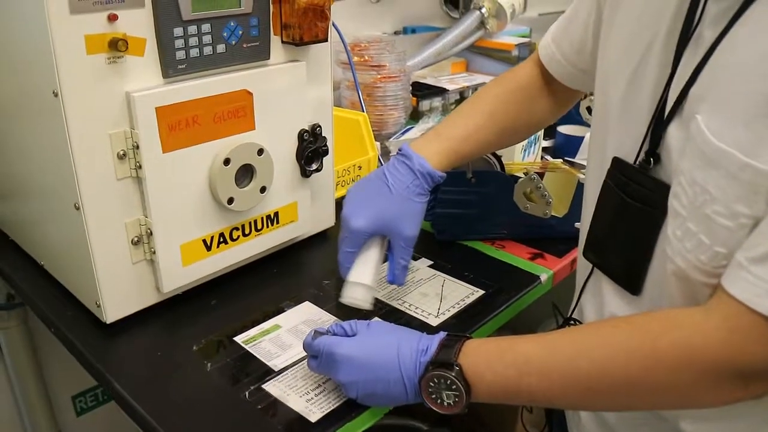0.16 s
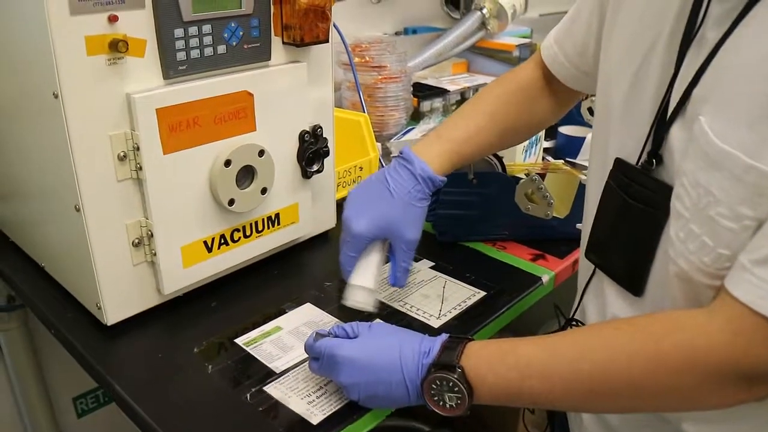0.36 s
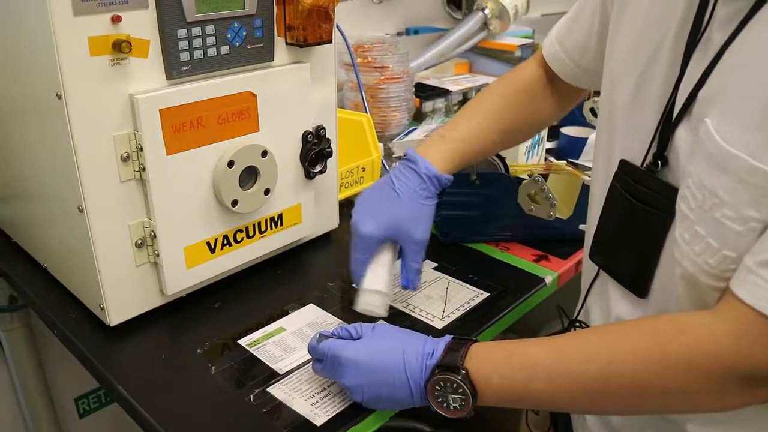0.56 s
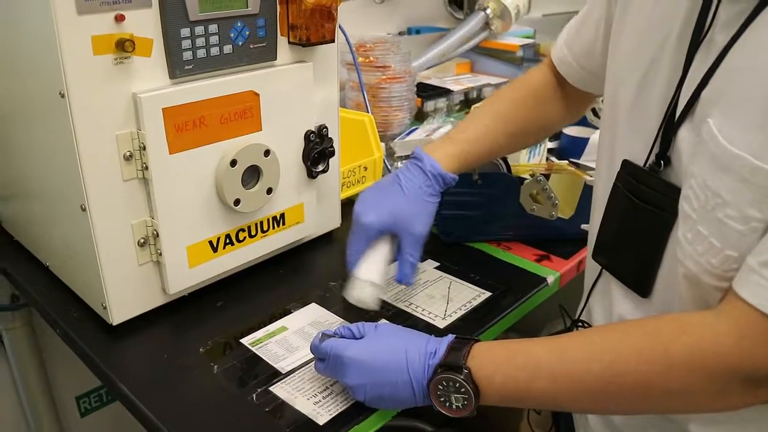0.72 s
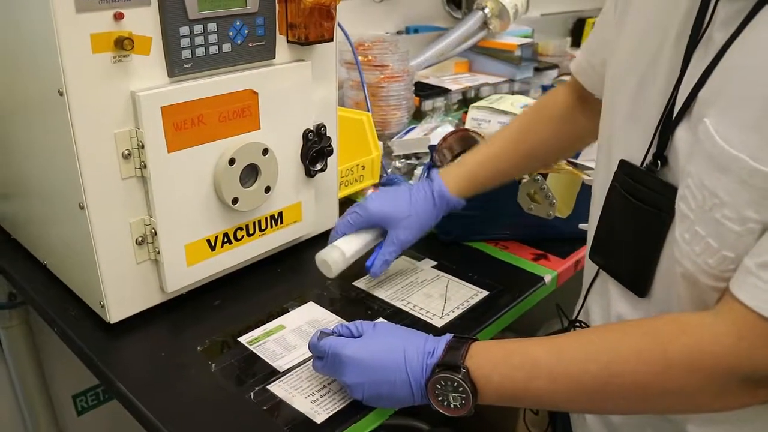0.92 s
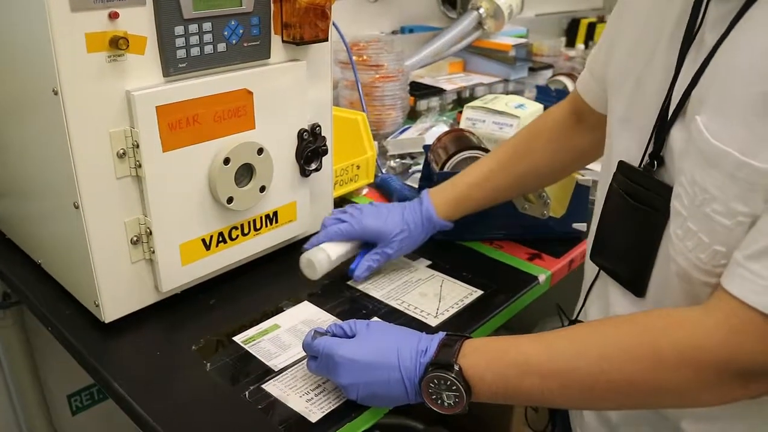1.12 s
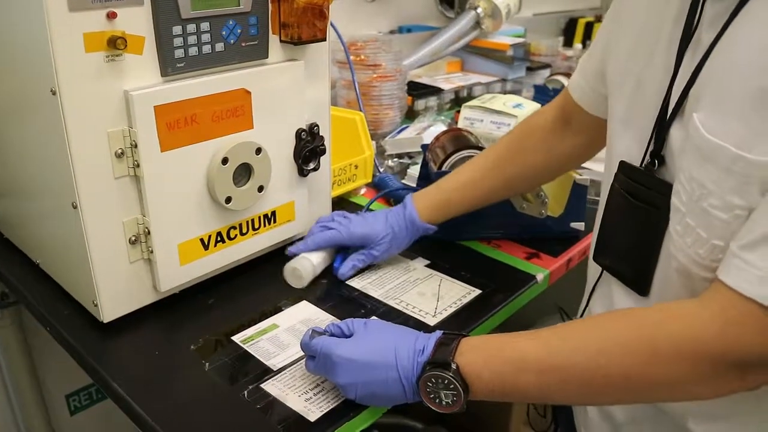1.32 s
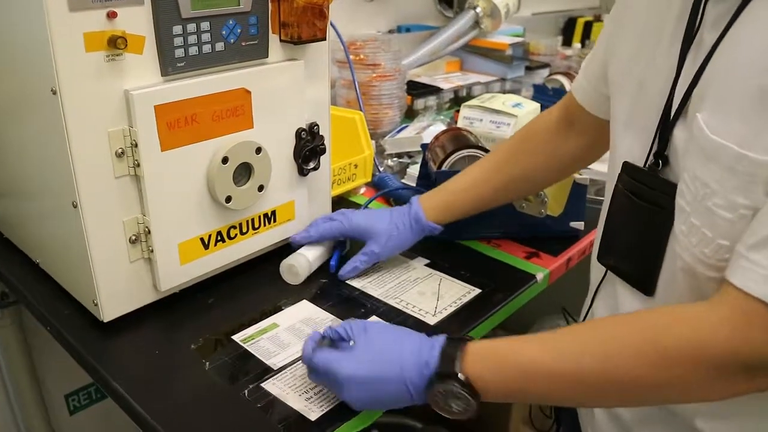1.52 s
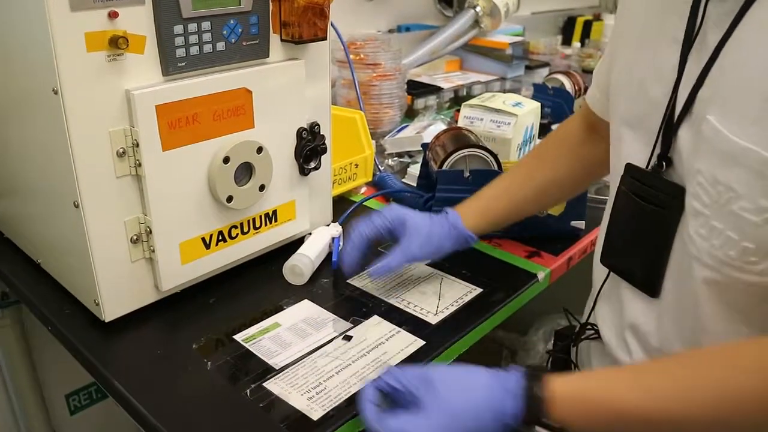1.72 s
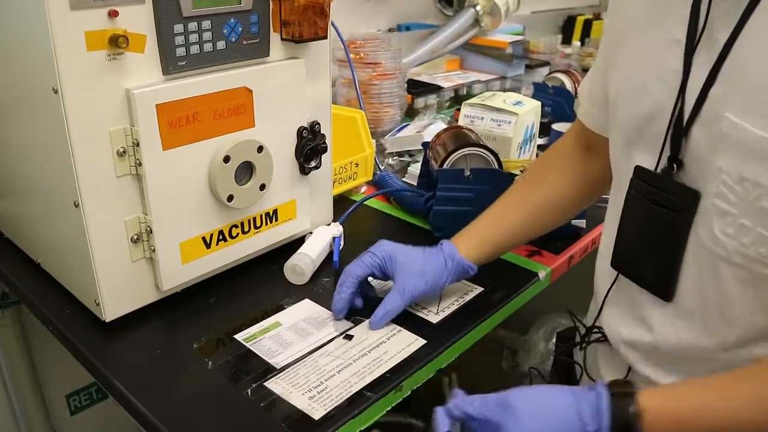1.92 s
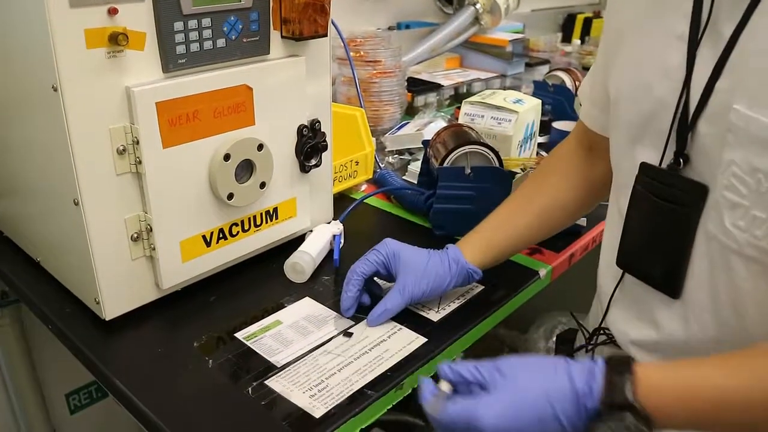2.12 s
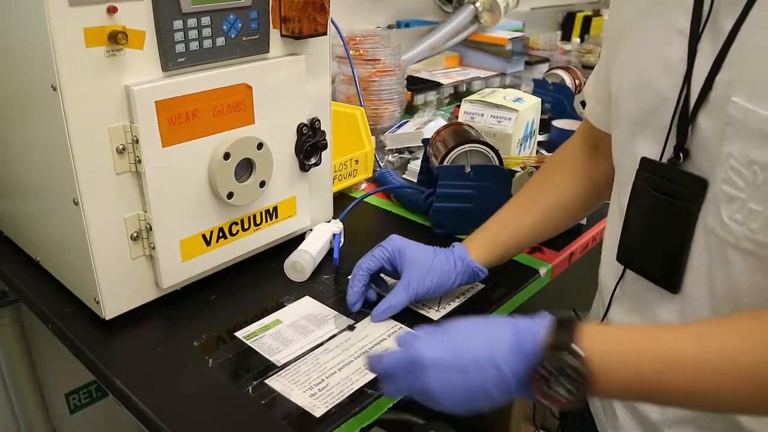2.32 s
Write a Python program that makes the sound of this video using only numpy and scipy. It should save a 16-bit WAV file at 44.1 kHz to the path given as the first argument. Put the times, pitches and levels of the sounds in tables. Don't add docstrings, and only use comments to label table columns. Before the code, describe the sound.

Close, bright air-jet hiss from a blower stops suddenly, leaving a rattling pump and fans in a small lab; then a sharp clattering knock rings the bench top, and the recorder's automatic gain ducks the background.

```python
import sys
import numpy as np
from scipy import signal
from scipy.fft import rfft, irfft
from scipy.io import wavfile
from scipy.ndimage import uniform_filter1d

SR = 44100
rng = np.random.default_rng(int(sys.argv[2]) if len(sys.argv) > 2 else 0)


def dump(signal):
    limited = np.clip(np.atleast_2d(signal).T, -1, 1)
    pcm = np.round(limited * 32767).astype(np.int16)
    wavfile.write(sys.argv[1], SR, pcm)


def invert_db(level):
    return 10 ** (np.asarray(level, dtype=float) / 20)


N = 104428
t = np.arange(N) / SR

STROKE_HZ = 59.6
PUFF_PHASE = .74
# frequency in Hz, width in Hz, level in dB.
VALVE_TONES = [(2750, 350, -5), (3300, 350, -4), (3740, 120, -10), (4100, 120, -10), (5400, 380, 0),
               (6000, 350, -1)]


def level(x, db):
    return x * invert_db(db) / np.sqrt(np.mean(x ** 2))


def band(x, hz, width):
    return signal.lfilter(*signal.iirpeak(hz, hz / max(width, 5), fs=SR), x)


def narrow_band(x, hz, width, second_width):
    return level(band(band(x, hz, width), hz, second_width), 0)


def ring(x, hz, t60):
    pole = np.exp(2j * np.pi * hz / SR - np.log(1000) / (max(t60, 1e-3) * SR))
    return signal.lfilter([1], [1, -pole], x).imag


def walk(rate):
    k = int(SR / rate)
    steps = np.repeat(rng.standard_normal(N // k + 1), k)
    drift = uniform_filter1d(uniform_filter1d(steps, k), k)[:N]
    return drift / drift.std()


def curve(rows, column=1):
    rows = np.array(rows)
    return np.interp(t, rows[:, 0], rows[:, column])


def coloured(points, flicker_db, rate):
    f = np.maximum(np.arange(N // 2 + 1) * SR / N, 1)
    hz, db = np.array(points).T
    gain = invert_db(np.interp(np.log(f), np.log(hz), db))
    out = 0
    for octave in np.arange(4, 15, .5):
        share = np.sqrt(np.clip(1 - 2 * np.abs(np.log2(f) - octave), 0, 1))
        part = irfft(rfft(rng.standard_normal(N)) * gain * share, N)
        out = out + part * invert_db(flicker_db * walk(rate))
    return level(out, 0)


def resonant(rows, flicker_db, rate):
    out = 0
    for hz, width, db in rows:
        noise = narrow_band(rng.standard_normal(N), hz, width, 1.56 * width)
        out = out + invert_db(db + flicker_db * walk(rate)) * noise
    return level(out, 0)


def blower():
    # time in seconds, level in dB, treble in dB as the nozzle turns.
    flow = [(0, -19, 0), (.2, -20.5, 3.5), (.26, -21, 4), (.3, -18.5, -0.5), (.46, -20.5, 5), (.58, -18, 3),
            (.8, -19, 1.5), (.86, -19.5, -0.5)]
    # frequency in Hz, width in Hz, level in dB.
    nozzle = [(2745, 590, -8.5), (3435, 380, -1), (4046, 250, -0.5), (4650, 600, -5), (9600, 410, -3.5),
              (9040, 510, -10.5)]
    # frequency in Hz, width in Hz, level in dB.
    airy = [(11500, 290, -6), (11840, 470, 0), (13000, 330, -1), (13600, 400, -6), (14300, 450, -4),
            (15300, 500, -1.5)]
    # frequency in Hz, level per Hz in dB.
    jet = [(300, -25.5), (800, -0.5), (1600, -0.5), (2000, -15), (5500, -0.5), (8000, -5.5), (10700, -9),
           (14500, -13.5)]
    shut_s, shut_db_per_s = .868, 330
    tail_db, tail_t60_s = -18, .2
    after = np.maximum(t - shut_s, 0)
    closing_power = invert_db(-2 * shut_db_per_s * after)
    tail_power = invert_db(2 * (tail_db - 60 * after / tail_t60_s))
    shut = np.sqrt(closing_power + tail_power)

    air = resonant(nozzle, 0.94, 40)
    air = air + invert_db(-14.5) * resonant(airy, 2.2, 6.4)
    air = air + invert_db(-8) * coloured(jet, 0.67, 17.3)
    bass = signal.sosfiltfilt(signal.butter(2, 7500, fs=SR, output="sos"), air)
    treble = (air - bass) * invert_db(curve(flow, column=2)) * shut ** .3
    gusts_db = .6 * walk(24.4)
    return (bass + treble) * invert_db(curve(flow) + gusts_db) * shut


def bench():
    # time in seconds, level in dB, contact in ms, crack in dB, tilt in dB per octave.
    contacts = [(1.3744, -1.5, 0.27, -16, -9), (1.381, -5, 0.44, -25, -20.5), (1.393, -11.5, 0.54, -25, -6),
                (1.4015, -10, 0.51, -25, 3), (1.4122, 10, 0.19, -1, 7.5), (1.4149, 11.5, 0.2, -4, -4.5),
                (1.4167, 3, 0.41, -25, 9.5), (1.42, 4.5, 0.44, -30, 8.5), (1.431, 9.5, 0.2, -20, 3.5),
                (1.449, 0.5, 0.32, -25, -1), (1.458, 0.5, 0.26, -25, -16), (1.467, -3, .4, -25, -11),
                (.846, -19.5, 0.25, -30, 13)]
    # frequency in Hz, level in dB, time to fade by 60 dB in seconds.
    modes = [(432, -17, 0.12), (600, -8.5, 0.063), (720, -2, 0.044), (865, -1.5, 0.035), (934, 2, 0.023),
             (1057, 2, 0.054), (1196, 6, 0.025), (1490, -2, 0.042), (1730, -5, 0.046), (2040, -19, 0.029),
             (2410, -9, 0.012), (3060, -9.5, 0.027), (3450, -9.5, 0.016), (4585, -13, 0.023)]
    out = np.zeros(N)
    crack_db, crack_t60_s, crack_hz = -12.5, 0.017, 3980
    grit = signal.lfilter(*signal.butter(2, crack_hz, fs=SR), rng.standard_normal(N))
    for start, db, ms, bright_db, tilt_db in contacts:
        push = np.exp(-.5 * ((t - start) / (ms / 4000)) ** 2)
        push /= push.sum()
        body = 0
        for hz, mode_db, t60 in modes:
            vary = rng.standard_normal()
            gain = invert_db(mode_db + 2 * vary + tilt_db * np.log2(hz / 800))
            body = body + gain * ring(push, hz * (1 + vary / 100), t60)
        fade_db = -60 * np.maximum(t - start, 0) / crack_t60_s
        crack = (t >= start) * invert_db(crack_db + bright_db + fade_db) * grit
        out += invert_db(db) * (0.17 * body + crack)
    out += handling_ticks()
    out = signal.sosfilt(signal.butter(2, 300, "high", fs=SR, output="sos"), out)

    room_db, room_t60_s = -14.5, 0.22
    lag = t[:SR // 2]
    build_up = np.minimum(lag * 200, 1)
    tail = band(rng.standard_normal(len(lag)), 930, 2200) * invert_db(-60 * lag / room_t60_s) * build_up
    return out + invert_db(room_db) * signal.fftconvolve(out, tail / 10)[:N]


def handling_ticks():
    # time in seconds, level in dB, frequency in Hz, width in Hz, time to fade by 60 dB in seconds.
    ticks = [
        (2.045, -41, 12000, 4000, .012),
        (2.077, -25, 1650, 400, .03),
        (.17, -24, 1600, 400, .04),
        (1.3755, -23, 3580, 200, .025),
    ]
    out = np.zeros(N)
    for start, db, hz, width, t60 in ticks:
        noise = narrow_band(rng.standard_normal(N), hz, width, 2 * width)
        fade = (t >= start) * invert_db(-60 * np.maximum(t - start, 0) / t60)
        out += invert_db(db) * fade * noise
    return out


def pump():
    turns = t * STROKE_HZ
    count = N // 500
    size_db = 1.3 * rng.standard_normal(count) + 2.5 * (np.arange(count) % 2)

    puff_share, leak_db = .25, -12
    since = (turns - PUFF_PHASE) % 1 / puff_share
    stroke = (turns - PUFF_PHASE + 1).astype(int)
    puff = since * np.exp(1 - since * 2) * invert_db(size_db[stroke])
    hiss = level(resonant(VALVE_TONES, 0.37, 7.32) * (puff + invert_db(leak_db)), -38)

    ring_hz, ring_width_hz = 4450, 230
    strike_phase, rebound_phase, rebound_db = .06, .331, -5

    def burst(phase):
        seconds = phase / STROKE_HZ
        return np.exp(-np.pi * ring_width_hz * seconds) * np.sin(2 * np.pi * ring_hz * seconds)

    strike = (turns - strike_phase) % 1
    rebound = (turns - strike_phase - rebound_phase) % 1
    case = band(burst(strike) + invert_db(rebound_db) * burst(rebound), ring_hz, 270)
    case = level(case, -38) * invert_db(walk(6.9))
    rattle = band(band(rng.standard_normal(N), 3670, 260), 4770, 380)
    rattle = level(rattle * (1.2 + np.exp(-strike / 0.22)), -39)
    return hiss + clacks(size_db) + case + rattle


def clacks(size_db):
    count = int(t[-1] * STROKE_HZ)
    jitter_s = .0003 * rng.standard_normal(count)
    times = (np.arange(count) + PUFF_PHASE + 0.048) / STROKE_HZ + jitter_s
    hit = np.zeros(N)
    hit[np.minimum((times * SR).astype(int), N - 1)] = invert_db(size_db[1:count + 1])
    out = 0
    for hz, width, db in VALVE_TONES:
        out = out + invert_db(db + walk(30)) * narrow_band(hit, hz, width, 1.5 * width)
    return level(out, -35.5)


def fans():
    # frequency in Hz, level per Hz in dB.
    fan_air = [(30, -39), (426, -2.5), (2010, -7), (4420, -6.5), (6900, -15), (9500, -15), (12500, -22),
               (16000, -33.5)]
    # frequency in Hz, width in Hz, level in dB.
    housing = [(217.5, 43, -12), (482, 184, 2), (814, 155, 0.5), (1283, 290, -0.5)]
    # frequency in Hz, level in dB.
    whine = [(431, -48), (1739, -48), (2325, -48)]
    out = invert_db(-31) * coloured(fan_air, 1.3, 8.14)
    out = out + invert_db(-33) * resonant(housing, 1.33, 7.23)
    for hz, db in whine:
        tone = np.sin(2 * np.pi * hz * t + .5 * walk(5.8))
        out = out + invert_db(db + 3 + 0.5 * walk(8.5)) * tone
    return out


def scene():
    echo_t60_s, echo_db = .12, -13
    lag = t[:SR // 8]
    echo = rng.standard_normal(len(lag)) * invert_db(-60 * lag / echo_t60_s)
    echo = level(echo, echo_db) / np.sqrt(len(lag))
    steady = blower() + fans()
    steady = steady + signal.fftconvolve(steady, echo)[:N]
    return (steady + bench() + pump())[None]


def low_pass(x):
    return signal.sosfilt(signal.butter(12, 16740, fs=SR, output="sos"), x)


def record(dry):
    # time in seconds, gain in dB.
    gain = [
        (0, -5.5),
        (.6, -1.5),
        (1.37, 2),
        (1.385, 1.5),
        (1.412, -1),
        (1.424, -13),
        (1.55, -10),
        (2.37, -2.5),
    ]
    x = signal.sosfilt(signal.butter(1, 60, "high", fs=SR, output="sos"), dry)
    x = np.clip(x * invert_db(curve(gain)), -1, 1)
    x = signal.sosfiltfilt(signal.ellip(12, .1, 50, 15720, fs=SR, output="sos"), x)
    return low_pass(x)


dry = scene()
out = record(dry)
dump(out)
```